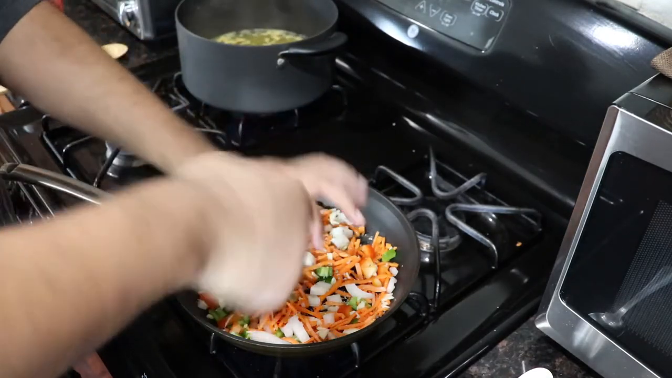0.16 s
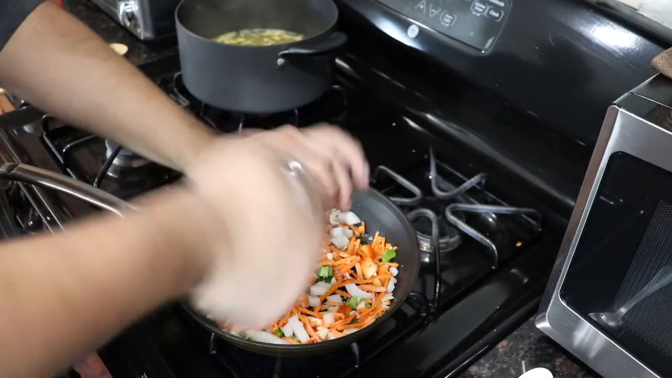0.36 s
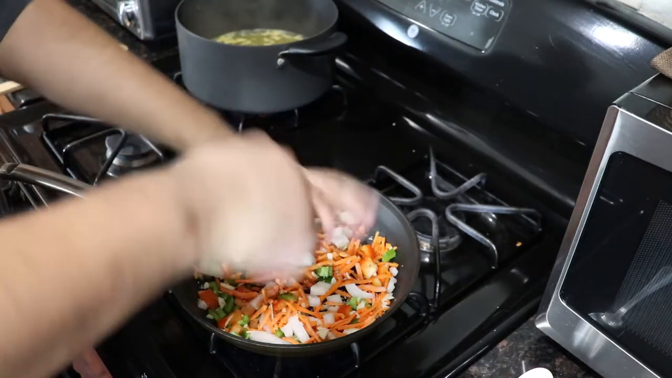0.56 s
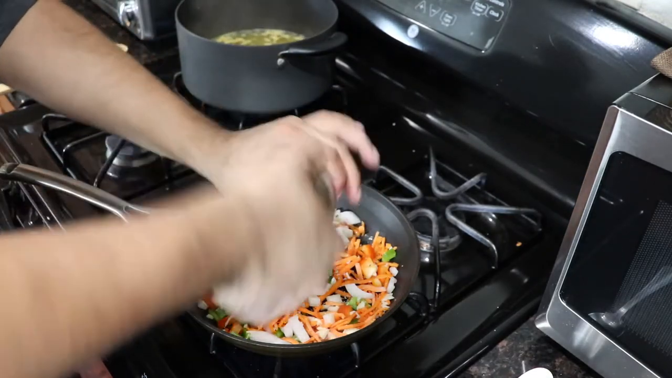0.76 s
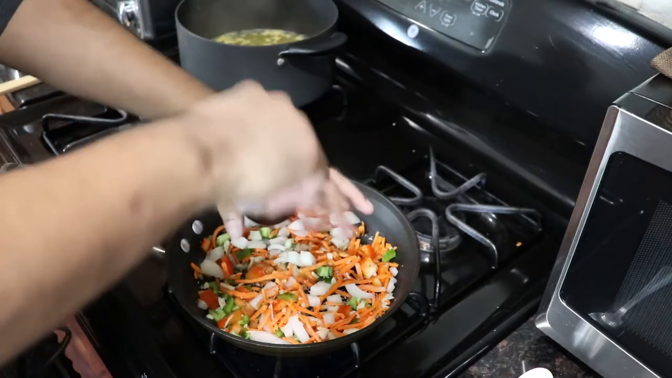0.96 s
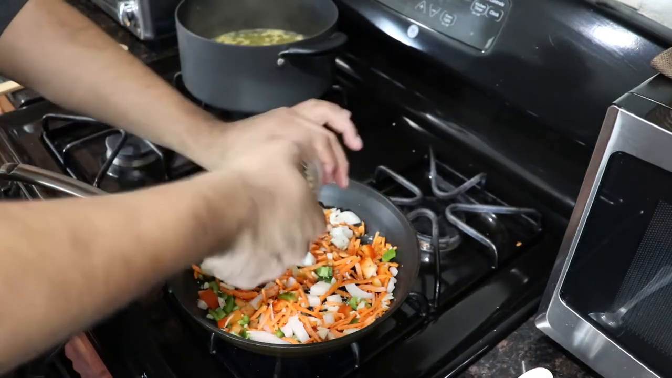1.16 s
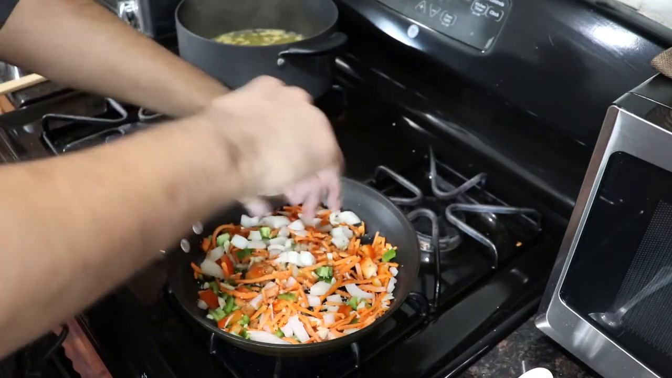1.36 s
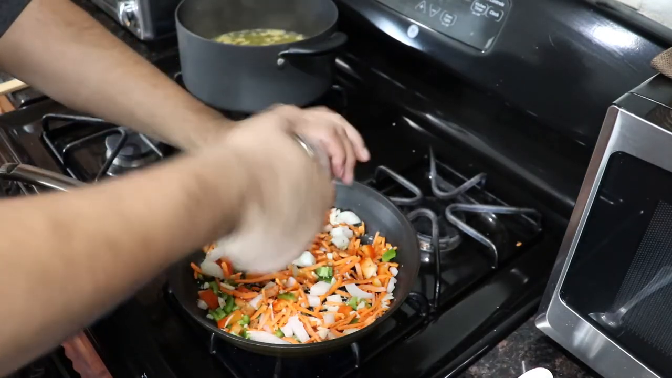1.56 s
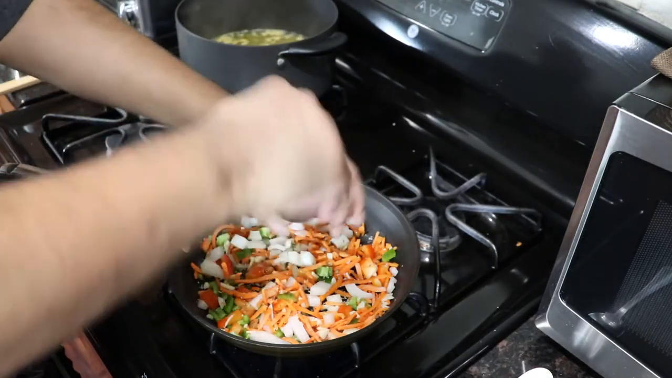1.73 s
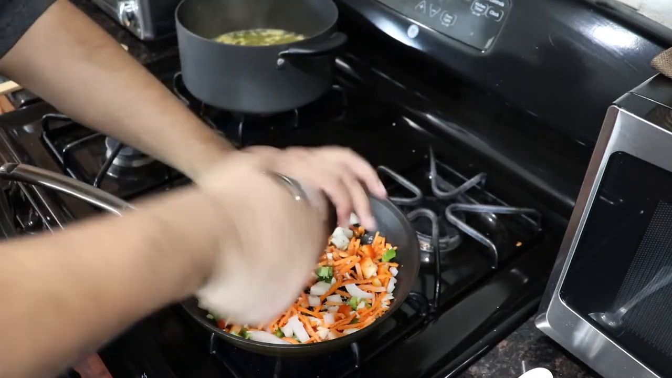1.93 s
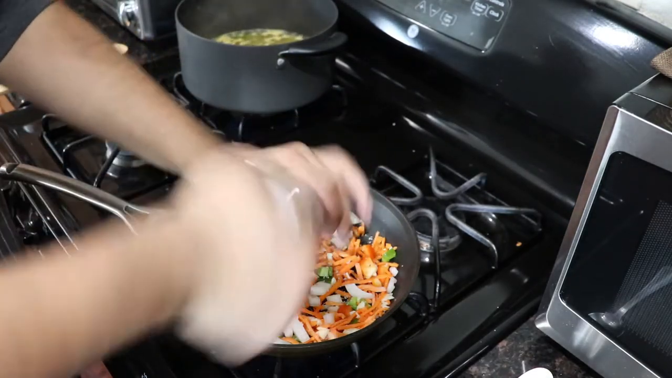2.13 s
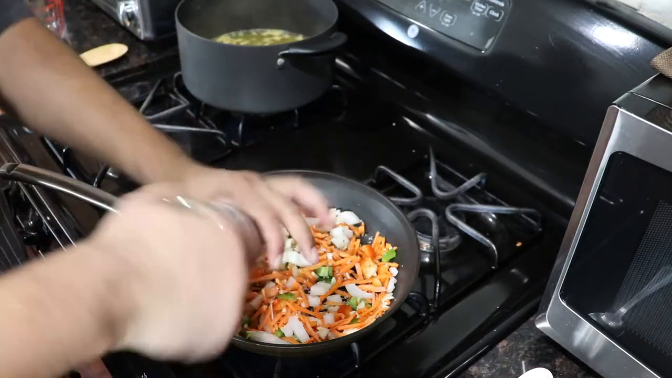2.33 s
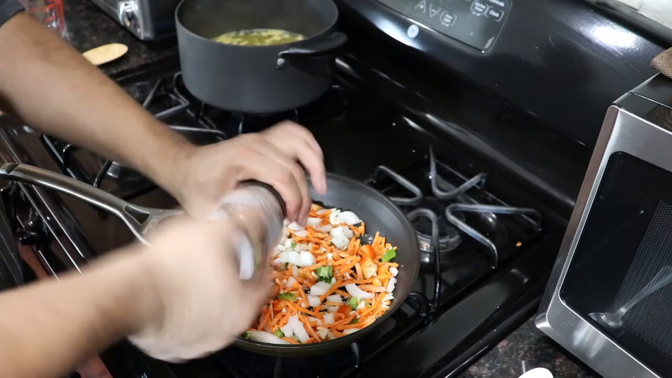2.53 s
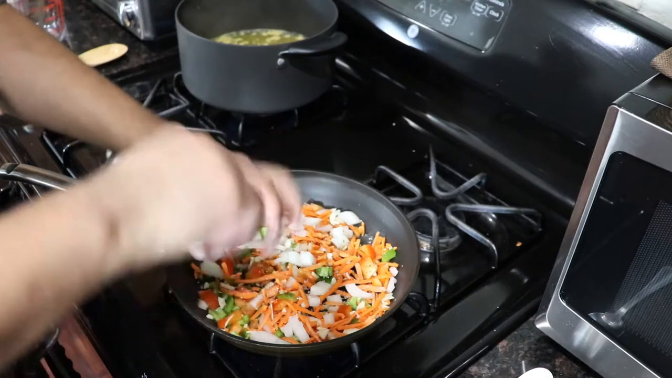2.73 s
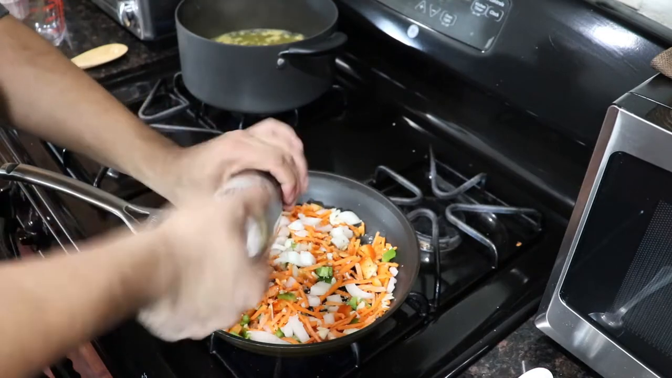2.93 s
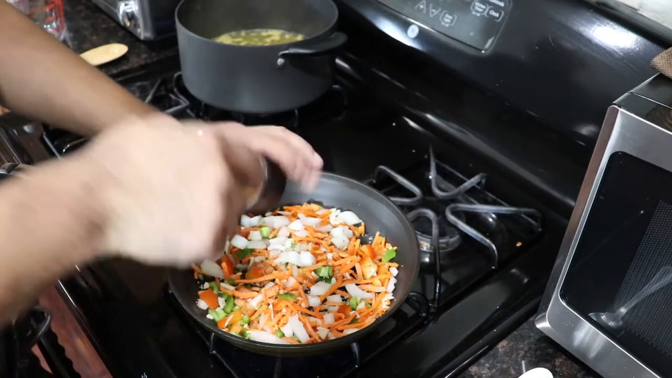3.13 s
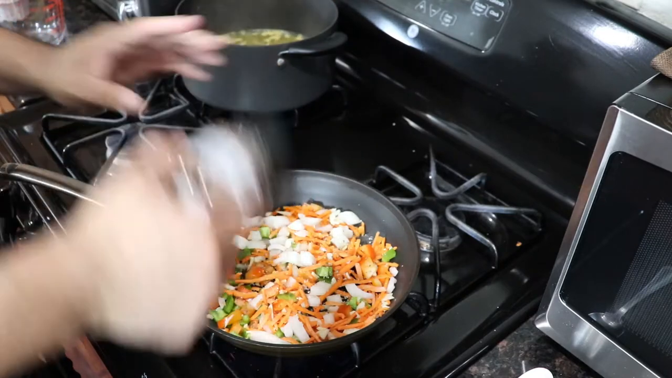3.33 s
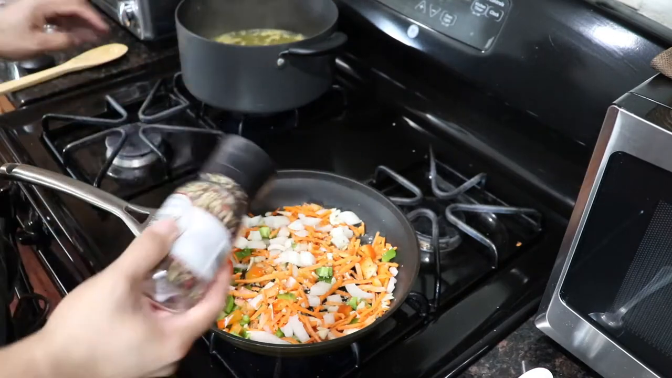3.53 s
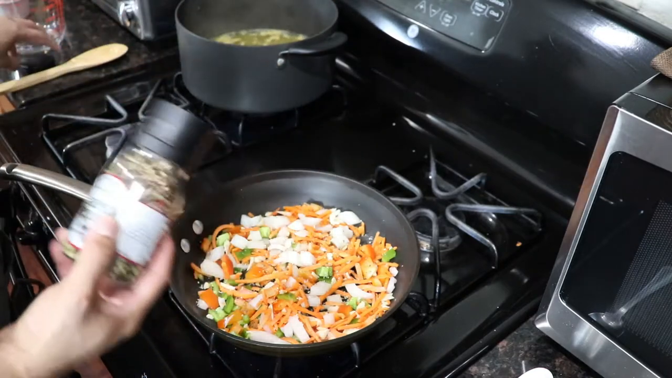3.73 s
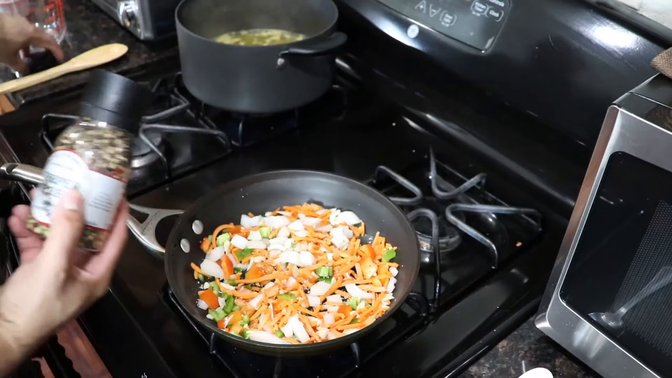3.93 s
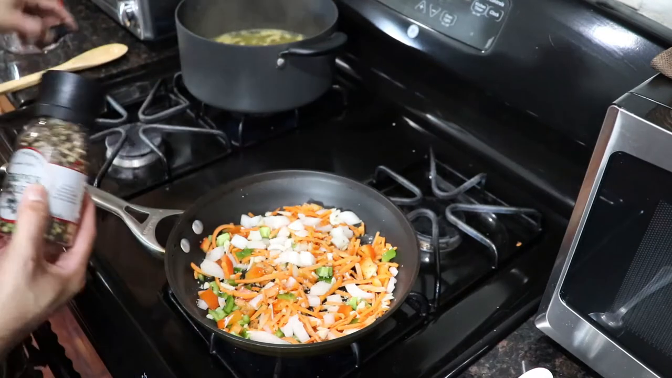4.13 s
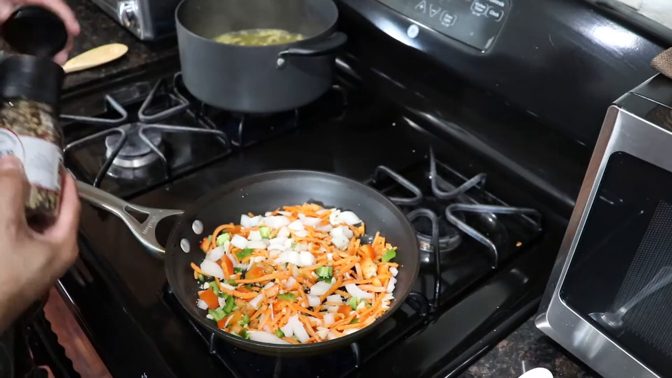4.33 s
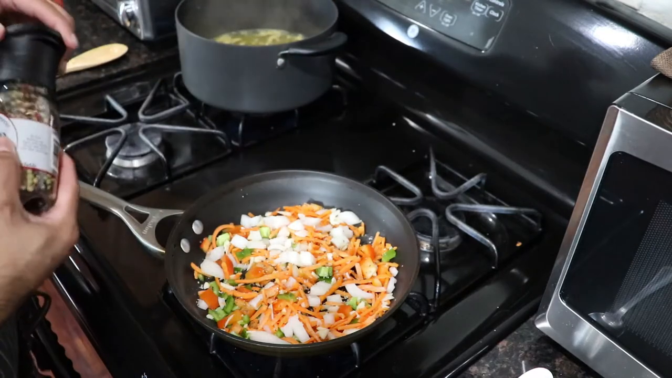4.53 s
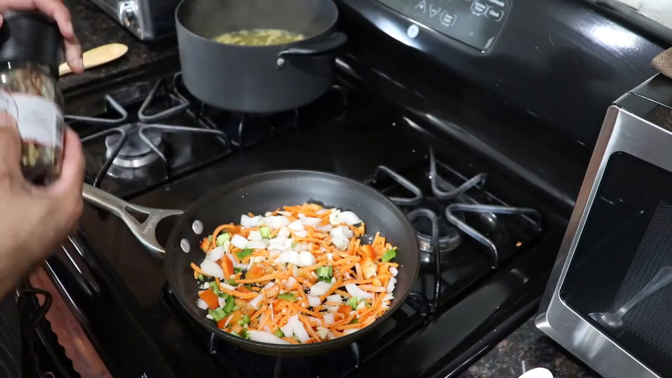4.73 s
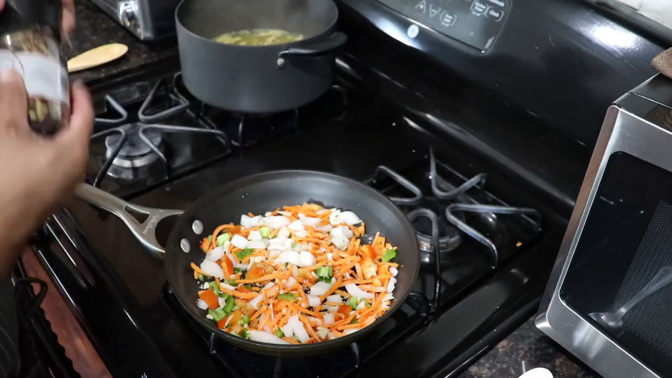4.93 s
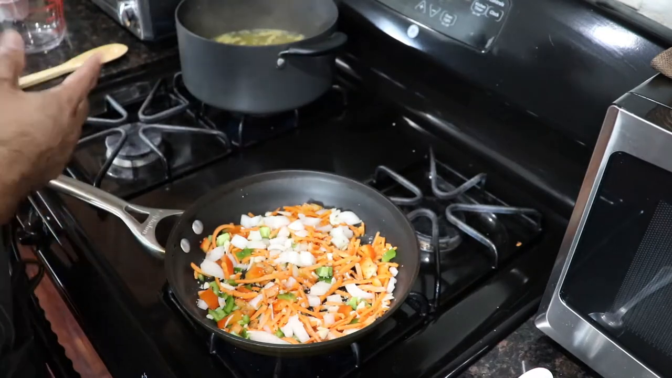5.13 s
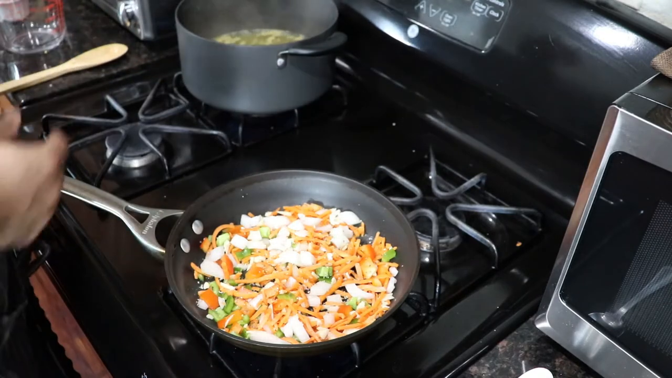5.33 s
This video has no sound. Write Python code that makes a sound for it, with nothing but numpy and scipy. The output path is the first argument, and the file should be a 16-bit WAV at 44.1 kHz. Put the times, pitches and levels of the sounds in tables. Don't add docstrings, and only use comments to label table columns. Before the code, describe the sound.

Fast, crackling bursts of peppercorns being ground over a hissing frying pan, then a short rattle, a pause, and plastic cap knocks.

```python
import sys
import numpy as np
from scipy import signal
from scipy.fft import rfft, irfft
from scipy.io import wavfile
from scipy.ndimage import uniform_filter1d, minimum_filter1d

SR = 44100
rng = np.random.default_rng(int(sys.argv[2]) if len(sys.argv) > 2 else 0)


def dump(signal):
    limited = np.clip(np.atleast_2d(signal).T, -1, 1)
    pcm = np.round(limited * 32767).astype(np.int16)
    wavfile.write(sys.argv[1], SR, pcm)


def level_to_linear(level):
    exponent = np.asarray(level, float) / 20
    return 10 ** exponent


N = 242064

# frequency in Hz, density in dB per Hz.
SIZZLE_HZ_DB = [(240, -51), (420, -34), (545, -11), (640, -7.5), (1050, -3.5), (1700, -0.5), (3100, -1),
                (5200, -3), (7600, -3.5), (8700, -7.5), (10200, -12), (12500, -10.5), (14500, -14.5),
                (16000, -20)]
# frequency in Hz, density in dB per Hz.
KITCHEN_HZ_DB = [(12, -35), (20, -9.5), (114, -8.5), (213, -9.5), (328, 0), (353, -3.5), (380, -6.5),
                 (544, -4), (700, -8), (910, -54), (1540, -120)]
# frequency in Hz, level in dB.
HUM_HZ_DB = [(41, -58), (120, -59)]
# frequency in Hz, width in Hz, level in dB.
JAR_MODES = [(1048, 115, -0.5), (1560, 430, -6.5), (1683, 290, 0), (1845, 256, -2.5)]
# frequency in Hz, width in Hz, level in dB.
THRUM_MODES = [(258.3, 49, 4), (313, 144, -2), (424, 280, -5), (667, 900, -11)]
# frequency in Hz, width in Hz, level in dB.
BURR_MODES = [(2400, 580, -5.5), (2930, 190, -0.5), (3214, 285, -1), (3920, 910, -2.5), (4210, 350, 0),
              (4770, 990, -17.5)]
# frequency in Hz, width in Hz, level in dB.
CORN_MODES = [(3710, 800, 0), (5984, 770, 5.5), (6560, 580, 7.5), (7240, 850, 8), (8330, 1800, 0.5),
              (12600, 2600, -8)]
# frequency in Hz, width in Hz, level in dB.
HOLLOW_MODES = [(1410, 290, 1.5), (1610, 140, 5.5), (1930, 140, 2), (2860, 230, -9)]
# start in seconds, length in seconds, rattle in dB.
SHAKES = [(0, .14, -26.5), (.26, 0.15, -27), (.44, 0.067, -28), (.62, 0.12, -28.5), (.80, 0.095, -24),
          (.99, 0.026, -28), (1.10, 0.16, -26.5), (1.35, 0.041, -29.5), (1.47, 0.13, -25.5),
          (1.70, .07, -30), (1.84, 0.017, -25), (1.94, 0.0068, -27), (2.05, 0.017, -26),
          (2.16, 0.099, -28.5), (2.43, 0.04, -24), (2.58, 0.1, -23.5), (2.76, 0.099, -27),
          (2.94, 0.031, -26), (3.015, 0.031, -23.5), (3.21, 0.017, -25.5), (3.46, 0.025, -21)]
# start in seconds, grinding length in seconds, burr in dB,
# jar wall in dB, jar thrum in dB.
TWISTS = [(0.074, 0.036, -19.5, -21.5, -29.5), (0.418, 0.032, -20, -20, -31.5),
          (0.61, 0.064, -26.5, -30.5, -42), (0.802, 0.032, -20.5, -20, -29.5),
          (0.97, 0.026, -30.5, -31.5, -41), (1.147, 0.064, -20, -20, -37), (1.325, 0.025, -27, -28.5, -36),
          (1.499, 0.075, -22.5, -21.5, -33), (1.686, 0.033, -33, -32.5, -44),
          (1.857, 0.018, -19, -22, -31.5), (1.927, 0.023, -36, -34, -57), (2.044, 0.013, -25.5, -26, -38),
          (2.195, 0.042, -20, -24.5, -50), (2.417, 0.045, -27.5, -33, -45),
          (2.593, 0.02, -19, -18.5, -30.5), (2.755, 0.13, -26.5, -27.5, -36), (2.931, 0.076, -22, -24, -33),
          (3.14, 0.0068, -31, -32, -76), (3.4, 0.062, -30, -27.5, -56), (3.45, 0.069, -28.5, -35, -64)]
# start in seconds, jar wall in dB, burr in dB, snap in dB.
CRACKS = [(0.0491, -22, -11, -9), (0.0651, -10.5, -22, -7.5), (0.099, -12.5, -9, -2.5),
          (0.145, -12.5, -10, -7.5), (0.449, -10.5, -14, -5), (0.4874, -15, -18, -7), (0.608, -9, -19, -25),
          (0.6308, -15, -9, -9), (0.7969, -13.5, -11, -9), (0.8463, -24, -9, -22), (1.1561, -7, 3, 9.5),
          (1.1953, -8.5, -12, -7), (1.2077, -6.5, -5, -14), (1.357, -17.5, -13.5, -13),
          (1.5236, -3, -17, -6), (1.5689, -27, -20, -5.5), (1.8491, -11, -16, -11),
          (1.8574, -12.5, -36, -7), (1.8802, -8.5, -2, 2.5), (2.0416, -14, -22, -28),
          (2.194, -21, -4.5, -1), (2.197, -5.5, -18, -13), (2.2577, -17, -3.5, -9), (2.2686, -14, -8, 1),
          (2.6168, -11, 2, -7), (2.796, -32, -29, -7.5), (2.8292, -10, -6, -6.5), (2.972, -10, -9.5, -13),
          (2.994, -25, -7, -6), (3.4731, -33, -15, -3)]
# start in seconds, burr in dB, snap in dB.
CHIPS = [(0.252, -20.5, -31), (0.3085, -17, -21), (0.402, -13, -17), (.4135, -16, -11), (0.4694, -8, -16),
         (.7, -24, -16), (0.758, -31, -9.5), (0.7835, -23, -23), (0.8143, -12, -27), (0.876, -19, -11),
         (1.0046, -15.5, -23), (1.0985, -35, -19), (1.241, -17, -11), (1.4717, -34, -24), (1.501, -18, -23),
         (1.5509, -9, -27), (1.905, -24, -29), (1.9545, -25, -8), (2.167, -34, -14), (2.1738, -24, -15),
         (2.2193, -11.5, -19), (2.223, -7.5, -17), (2.4343, -32, -16), (2.4674, -21, -14),
         (2.771, -15, -25), (2.938, -22, -16), (3.0465, -25, -16), (3.1613, -15.5, -22), (3.213, -30, -7.5),
         (3.484, -33, -13)]
# time in seconds, peak in dB.
JERKS = [(.07, -24), (1.2, -27), (1.553, -30), (1.665, -30), (1.712, -30), (1.785, -31), (2.042, -28),
         (2.221, -24), (2.258, -34), (2.601, -22), (2.828, -20), (2.961, -28), (2.993, -25.5), (4.605, -32),
         (4.654, -27.5), (4.691, -30), (4.881, -23.5)]
# start in seconds, signed height, length in seconds.
THUMPS = [
    (1.1557, .22, .0026),
    (4.8797, -.09, .002),
    (4.8817, .06, .003),
    (4.8877, -.07, .002),
]
# start in seconds, length in seconds, hollow rush in dB,
# rattle in dB.
TIPS = [
    (3.764, 0.012, -27, -24.5),
    (5.138, .02, -39, -24),
]
# start in seconds, peak in dB, pitch in Hz, t60 in seconds, scrape in dB.
CAP_KNOCKS = [(4.495, -18.5, 796, 0.0036, -6), (4.507, -27, 1330, 0.017, -5),
              (4.5247, -6.5, 920, 0.0037, -0.5), (4.534, -32, 1600, .015, -5), (4.595, -24, 2400, 0.039, 2),
              (4.600, -18, 1660, 0.017, 5), (4.6045, -18.5, 550, 0.011, 0), (4.608, -26, 4960, 0.02, -1.5),
              (4.61, -20, 1710, .04, 1), (4.617, -25, 1950, 0.007, -3), (4.652, -16.5, 620, 0.0043, 1.5),
              (4.6919, -6, 1250, 0.0031, -2), (4.699, -25, 1280, 0.075, 1), (4.795, -23.5, 503, .008, 0.5),
              (4.840, -17, 600, 0.0082, -2), (4.8794, -10, 675, 0.0092, 1.5),
              (4.888, -9.5, 860, 0.0033, -3), (5.38, -39, 543, 0.37, -1)]


def rms_one(x):
    return x / np.sqrt(np.mean(x ** 2) + 1e-20)


def drift(rate_hz):
    r = np.exp(-2 * np.pi * rate_hz / SR)
    wander = signal.lfilter([1], [1, -2 * r, r * r], rng.standard_normal(N + 4000))
    return rms_one(wander[4000:])


def grains(per_s, spread_db):
    size_db = spread_db * np.minimum(rng.exponential(1, N), 4)
    sizes = level_to_linear(size_db) * rng.choice([-1, 1], N)
    return sizes * (rng.random(N) < per_s / SR)


def body(x, modes):
    out = 0
    for k, (hz, width_hz, db) in enumerate(modes):
        r = np.exp(-np.pi * width_hz / SR)
        b = [(1 - r * r) / 2, 0, (r * r - 1) / 2]
        a = [1, -2 * r * np.cos(2 * np.pi * hz / SR), r * r]
        out = out + (-1) ** k * level_to_linear(db) * signal.lfilter(b, a, x + 1e-18)
    return out


def coloured(x, spectrum):
    hz, db = np.transpose(spectrum)
    grid_hz = np.maximum(np.arange(N // 2 + 1) * SR / N, 1)
    colour_db = np.interp(np.log(grid_hz), np.log(hz), db)
    return rms_one(irfft(rfft(x) * level_to_linear(colour_db), N))


def struck(clicks, modes, uneven_db):
    rung = 0
    for k, mode in enumerate(modes):
        hits = clicks * level_to_linear(uneven_db * rng.standard_normal(N))
        rung = rung + body(hits, [mode]) * (-1) ** k
    power = uniform_filter1d(rung ** 2, size=1300)
    return rms_one(rung / (power + 1e-9) ** 0.08)


def strokes(rows, rise_db_per_s, fade_db_per_s, jolt_db=0):
    sag_db_per_s, jolt_s = 12.5, 0.027
    t, power = np.arange(0, N, 32) / SR, 0
    for s, length_s, db in rows:
        age = np.maximum(t - s, 0)
        db = db - rise_db_per_s * np.maximum(s - t, 0) - sag_db_per_s * np.minimum(age, length_s)
        db = db - fade_db_per_s * np.maximum(age - length_s, 0) + jolt_db * np.exp(-age / jolt_s)
        power = power + level_to_linear(2 * db)
    return np.interp(np.arange(N) / SR, t, np.sqrt(power))


def pan():
    level_db, pop_db = -29, 11.0
    fizz = grains(14000 * level_to_linear(1.2 * drift(20)), 2.2) * level_to_linear(0.3 * drift(6))
    pops = signal.lfilter([1, -0.7], [1], grains(45 * level_to_linear(1.3 * drift(2.7)), 2.4))
    return level_to_linear(level_db) * coloured(rms_one(fizz) + level_to_linear(pop_db) * pops, SIZZLE_HZ_DB)


def kitchen():
    rush_db = -43
    t = np.arange(N) / SR
    hum = sum(level_to_linear(db + 3) * np.sin(2 * np.pi * hz * t) for hz, db in HUM_HZ_DB)
    return level_to_linear(rush_db) * coloured(rng.standard_normal(N), KITCHEN_HZ_DB) + hum


def crushing():
    catch_db_per_s, jolt_db = 409, -3
    s, length_s, burr_db, wall_db, thrum_db = np.transpose(TWISTS)
    burr = strokes(zip(s, length_s, burr_db), catch_db_per_s, 91, jolt_db)
    wall = strokes(zip(s, length_s, wall_db), catch_db_per_s, 152, jolt_db)
    thrum = strokes(zip(s, length_s, thrum_db), catch_db_per_s, 298)
    rattle = strokes(SHAKES, rise_db_per_s=246, fade_db_per_s=190)
    fractures = grains(450 * level_to_linear(4.0 * drift(60)), 2.9)
    grit = grains(750 * level_to_linear(4.0 * drift(60)), 2.3) + 0.45 * fractures
    ticks = grains(3500 * level_to_linear(5.4 * drift(60)), 3.1) + 0.43 * grit
    out = wall * struck(fractures, JAR_MODES, uneven_db=3.0)
    out = out + thrum * struck(fractures, THRUM_MODES, uneven_db=3.5)
    out = out + burr * struck(grit, BURR_MODES, uneven_db=2.0)
    return out + rattle * struck(ticks, CORN_MODES, uneven_db=3.5)


def cracks():
    chip_wall_db, uneven_db, snap_top_hz = -8.5, 1.36, 10300
    wall_modes = JAR_MODES + [(303, 105, -17.5), (600, 1100, -16.5)]
    # modes, splintering decay in seconds, crest in dB.
    parts = [(wall_modes, 0.0016, 3), (BURR_MODES, 0.0022, 3), (CORN_MODES, 0.0011, 3)]
    chips = [(s, burr_db + chip_wall_db, burr_db, snap_db) for s, burr_db, snap_db in CHIPS]
    bursts = CRACKS + chips
    age, out = np.arange(1300) / SR, np.zeros(N)
    noise = rng.standard_normal((len(bursts), 3, len(age)))
    for (s, *levels_db), splinters in zip(bursts, noise):
        i = round(s * SR)
        chance = splinters[0, ::-1]
        for db, shock, (modes, last_s, crest_db) in zip(levels_db, splinters, parts):
            shock = np.r_[1.6, shock[1:]] * np.exp(-age / last_s)
            uneven = [(hz, width_hz, mode_db + uneven_db * z)
                      for (hz, width_hz, mode_db), z in zip(modes, chance)]
            ring = body(shock, uneven)
            out[i:i + len(age)] += level_to_linear(db + crest_db) * ring / abs(ring).max()
    return signal.lfilter(*signal.butter(2, snap_top_hz, fs=SR), out)


def jerks():
    s, db = np.transpose(JERKS)
    knocks = np.zeros(N)
    knocks[(s * SR).astype(int)] = level_to_linear(db + 44.5)
    return body(signal.lfilter([0.1], [1, -0.9], knocks), THRUM_MODES)


def thumps():
    t, out = np.arange(N) / SR, 0
    for s, height, length_s in THUMPS:
        out = out + height * np.sin(np.pi * np.clip((t - s) / length_s, 0, 1)) ** 2
    return out


def sliding():
    rise_db_per_s, fade_db_per_s, burr_db = 179, 162, 8.0
    stream = grains(5000 * level_to_linear(3.0 * drift(45)), 4.9)
    hollow = rms_one(body(stream, HOLLOW_MODES))
    bright = rms_one(body(stream, CORN_MODES) + level_to_linear(burr_db) * body(stream, BURR_MODES))
    s, length_s, rush_db, rattle_db = np.transpose(TIPS)
    rush = strokes(zip(s, length_s, rush_db), rise_db_per_s, fade_db_per_s)
    rattle = strokes(zip(s, length_s, rattle_db), rise_db_per_s, fade_db_per_s)
    return rush * hollow + rattle * bright


def cap():
    out, age = np.zeros(N), np.arange(3000) / SR
    puffs = rng.standard_normal((len(CAP_KNOCKS), len(age)))
    for (s, db, hz, t60_s, scrape_db), puff in zip(CAP_KNOCKS, puffs):
        swing = np.sin(2 * np.pi * hz * age) + 0.45 * np.sin(2 * np.pi * 2.0 * hz * age)
        push = -swing * np.tanh(age / 0.00016) * level_to_linear(5.5 - 60 * age / max(t60_s, 0.003))
        rub = body(body(puff, [(hz + 100, 800, 0)]), [(hz + 100, 1100, 0)])
        scrape = rms_one(rub) * level_to_linear(scrape_db - 1.5 - 60 * age / (t60_s + 0.01))
        i = round(s * SR)
        has_push = scrape_db < -1
        out[i:i + len(age)] += level_to_linear(db) * (push * has_push + scrape)
    return signal.lfilter(*signal.butter(1, 220, "high", fs=SR), out)


def echoes(x):
    tail_db, t60_s, gap_s = -11, 0.17, 0.003
    age = np.arange(6000) / SR
    tail = rng.standard_normal(len(age))[::-1] * level_to_linear(-60 * age / t60_s) * (age > gap_s)
    tail = signal.lfilter([1, -1], [1, -1.47, 0.51], tail)
    tail = tail / np.sqrt(np.sum(tail ** 2))
    return x + level_to_linear(tail_db) * signal.fftconvolve(x, tail)[:N]


def lag(x, time_s):
    keep = np.exp(-1 / (time_s * SR))
    return signal.lfilter([1 - keep], [1, -keep], x)


def ducking(mono):
    threshold_db, slope, rest_gain_db, recover_db_per_s = -18.5, 1.01, 1, 125
    sense_s, attack_s, hold_s = 0.011, 0.012, 0.07
    level_db = 10 * np.log10(lag(mono ** 2, sense_s) + 1e-12)
    over_db = np.maximum(level_db - threshold_db, 0)
    half = round(hold_s * SR / 2)
    held_db = -minimum_filter1d(-over_db, size=2 * half + 1, origin=half)
    ramp_db = recover_db_per_s * np.arange(N) / SR
    recovering_db = np.maximum.accumulate(held_db + ramp_db) - ramp_db
    return level_to_linear(rest_gain_db - slope * lag(recovering_db, attack_s))


def scene():
    mill_duck_share = 0.25
    mill = echoes(crushing() + jerks() + sliding() + cracks() + cap()) + thumps()
    gain = ducking(mill)
    mono = mill * gain ** mill_duck_share + gain * (pan() + kitchen())
    return np.array([mono, mono])


def band_limit(x):
    return signal.sosfilt(signal.butter(12, 16290, fs=SR, output="sos"), x)


def record(dry):
    cutoff_hz = 15700
    overloaded = 1.04 * dry / (1 + dry ** 4) ** 0.25
    steep = signal.ellip(10, 0.5, 60, cutoff_hz, fs=SR, output="sos")
    mix = np.clip(signal.sosfilt(steep, overloaded), -1, 1)
    return band_limit(mix)


dry = scene()
out = record(dry)
dump(out)
```